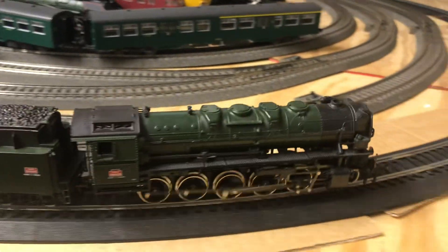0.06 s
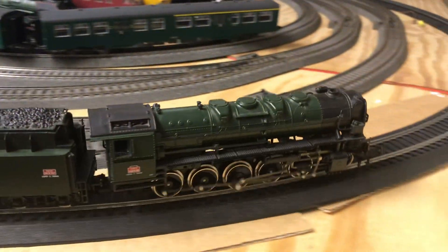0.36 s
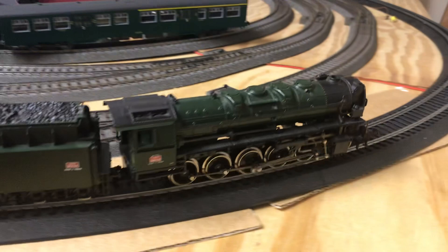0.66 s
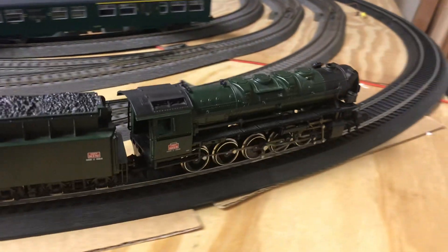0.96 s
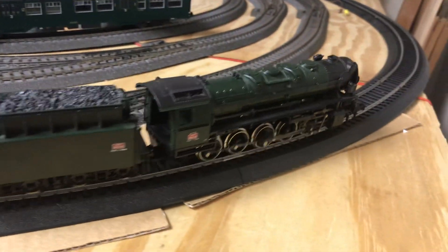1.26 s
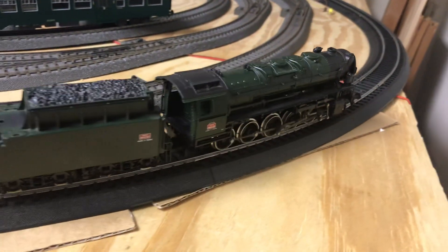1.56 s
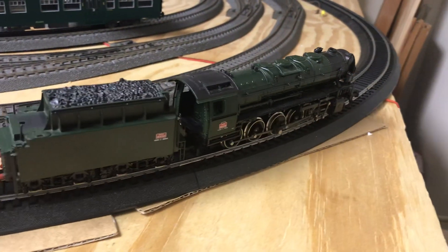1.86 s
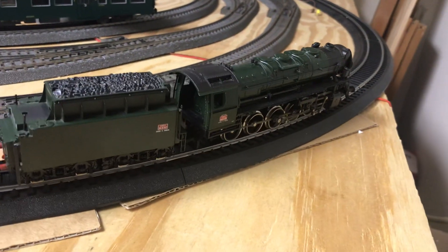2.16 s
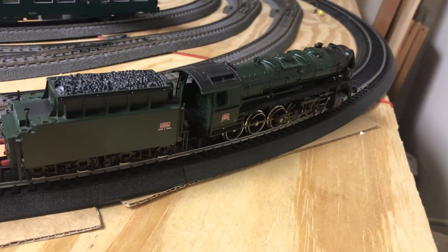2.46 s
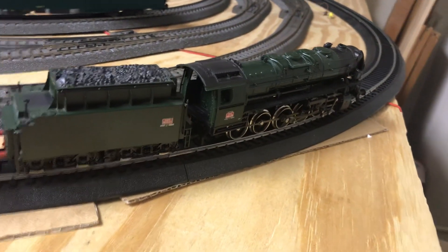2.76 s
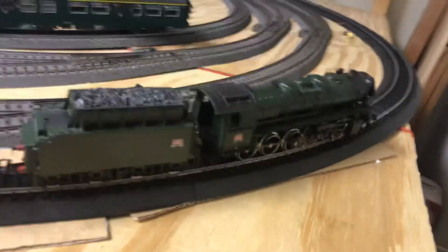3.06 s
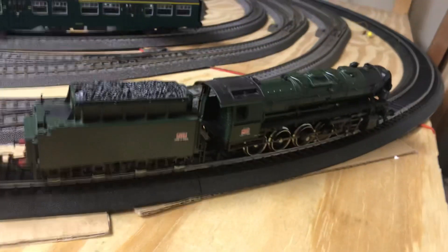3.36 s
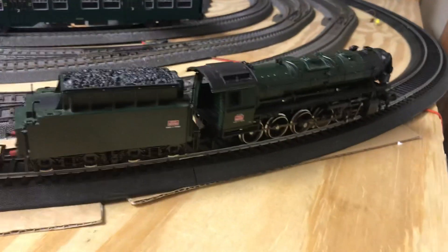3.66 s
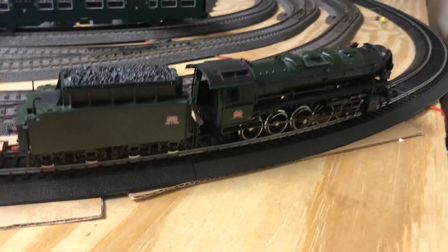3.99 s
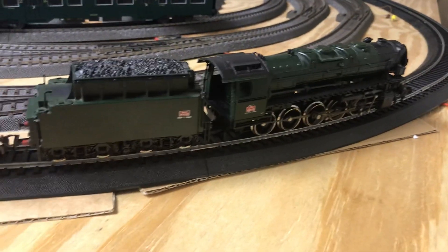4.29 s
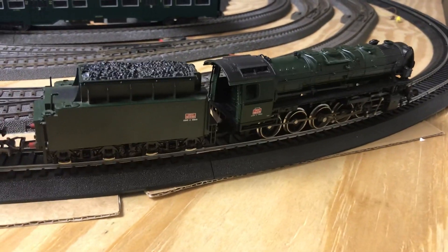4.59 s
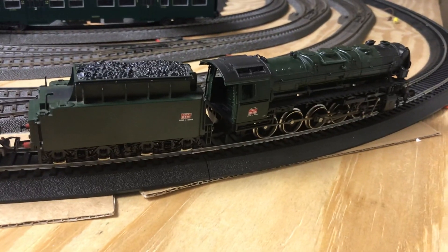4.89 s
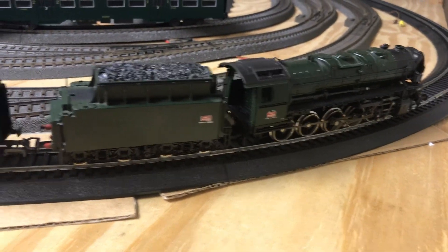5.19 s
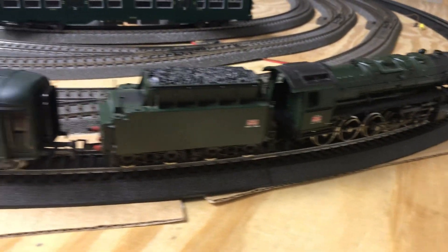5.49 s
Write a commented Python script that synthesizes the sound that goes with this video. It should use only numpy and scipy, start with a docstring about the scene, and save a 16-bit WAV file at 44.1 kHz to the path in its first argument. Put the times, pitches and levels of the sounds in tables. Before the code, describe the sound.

A model train's motor whines and rattles, falling in pitch until it stops; then a hand brushes near the microphone and a switch clicks.

```python
"""A quiet room with a plywood layout, where a model steam locomotive runs and slows to a stop.
Its gear teeth whine and chatter in the shell, its brushes fizz, its wheels grind and knock on the rails;
the whine falls with the speed. Then a hand slides and bumps on a case near the microphone,
a plastic switch clicks a little way off, and small things settle over faint rumble and hiss."""
import sys
import numpy as np
from scipy import signal
from scipy.fft import rfft, irfft, next_fast_len
from scipy.io import wavfile
from scipy.ndimage import map_coordinates

SR = 44100
rng = np.random.default_rng(int(sys.argv[2]) if len(sys.argv) > 2 else 0)


def materialize(psi):
    """Save the field psi as 16-bit PCM at rate SR to the path in sys.argv[1].

    A 1-D psi becomes a single channel; in a 2-D psi each row is a channel.
    """
    bounded = np.clip(np.atleast_2d(psi).T, -1, 1)
    quanta = np.round(bounded * 32767).astype(np.int16)
    wavfile.write(sys.argv[1], SR, quanta)


N = 253045

# drive speed, as the rate at which gear teeth meet: time_s, mesh_hz
DRIVE_SPEED = [(0, 1330.5), (.17, 1245), (.46, 1248.5), (.54, 1198), (.6, 1164.5), (.72, 1151.5),
               (.8, 1079), (.9, 991.5), (.98, 932), (1.13, 886), (1.2, 853), (1.41, 815), (1.5, 745),
               (1.55, 689.5), (1.6, 658), (1.68, 621.5), (1.73, 582), (1.78, 562.5), (1.85, 420.5),
               (1.92, 381.5), (2.02, 237.5), (2.1, 178), (2.2, 101), (2.26, -0.5)]
# swells and dips of the load on the drive: time_s, gain_db
DRIVE_LOAD = [(0, 0.5), (.55, -1), (.58, 1), (.68, 0.5), (.77, -1), (1, 0.5), (1.19, 1), (1.23, -0.5),
              (1.27, 0.5), (1.39, .5), (1.42, -3.5), (1.47, 1.5), (1.59, -2.5), (1.63, -0.5), (1.7, 1),
              (1.75, -1.5), (1.79, 2), (1.835, -2), (1.86, 2), (1.9, 0), (1.94, -4), (1.99, -1),
              (2.006, -7.5), (2.05, 3.5), (2.086, -7), (2.112, -6.5), (2.138, -1), (2.17, -10), (2.21, -19)]
# the engine turning away along the curve: time_s, rear_share
REAR_VIEW = [(0, 0.25), (.5, 0.2), (1.1, 0.59), (1.6, 1)]
# resonances: centre_hz, width_hz, gain_db
GEARBOX_MODES = [(592, 50, -46), (642, 100, -41), (835, 74, -35.5), (976, 36, -40), (1165.6, 50, -35.3),
                 (1249, 76, -42)]  # swell the whine as it slides through them
OCTAVE_MODES = [(1126, 130, -38.5), (1280, 114, -36), (1487, 200, -37), (1700, 85, -45), (2100, 190, -37)]  # swell the whine's octave
SHELL_MODES = [(594, 46, -9), (827, 33, -4), (980, 105, -11.5), (1264, 93, 0), (1474, 235, -5.5),
               (2120, 180, -7.5), (2690, 210, -6.5), (3700, 740, -18)]  # shell and chassis
ROD_MODES = [(810, 130, 0.5), (1335, 300, 5), (1720, 260, 0)]
# tone colours: frequency_hz, gain_db
CHATTER_EQ = [(40, -40), (130, -29), (280, -20), (420, -16), (520, -20.5), (700, -11.5), (1050, -7.5),
              (1350, -4.5), (1700, -5.5), (2150, -4), (2350, -10.5), (2800, -7.5), (3200, -23), (4500, -44)]  # midrange rasp of the teeth
WHEEL_EQ = [(1500, -25), (3150, -3.5), (3650, 2.5), (4500, 0), (5800, 0.5), (6800, -3.5), (7900, -10.5),
            (8800, -2.5), (10300, -13.5), (12000, -16)]  # bright metal on rail
BRUSH_SIDE_EQ = [(7000, -15), (10400, -10), (11300, -5.5), (12000, -6.5), (13100, -7.5), (14000, -1),
                 (14800, 5.5), (15800, -1.5)]  # fizz from the side
BRUSH_REAR_EQ = [(7000, -31), (10400, -12), (11300, 0.5), (12100, -3.5), (13000, 5), (14000, -2.5),
                 (14900, 0), (15800, -3.5)]  # fizz from behind
BOARD_EQ = [(20, -23), (45, -18), (65, -3), (85, 5), (200, -31), (600, -60)]  # plywood boom
SKIN_EQ = [(350, -45), (600, -9), (1160, -6.5), (1520, -10), (1790, -9.5), (4340, -15), (7100, -15),
           (15700, -21)]  # sliding skin
CASE_EQ = [(40, -26), (130, 9), (220, -16), (480, 5.5), (700, -15), (1150, -9.5), (1600, -5), (2400, -12.5),
           (4300, -8), (6500, -17), (15000, -44)]  # the bumped case
SWITCH_EQ = [(250, -33), (450, -0.5), (650, -13), (1150, -2), (1380, 3.5), (1600, -3), (2350, 2), (3100, 2),
             (4300, -2), (4700, -8.5), (7800, -16.5), (8800, -4.5), (9600, -30), (12000, -40)]  # plastic click
AIR_EQ = [(13, -45), (22, -15), (59, 0.5), (87, -9), (128, -8), (147, -9), (193, -7.5), (465, -18),
          (646, -20), (924, -23.5), (1470, -27), (2050, -29.5), (3010, -30), (5080, -33.5), (15700, -38.5)]  # room tone
# wheel and rod knocks: start_s, level_db, rod_share
KNOCKS = [(1.024, -22, 0), (1.1549, -20, 0.3), (1.34, -24.5, 0.07), (1.7748, -21, 0.8), (1.8931, -20, 0.25),
          (1.899, -28, 0.25), (1.923, -22, 0.4), (1.9492, -32, 0.2), (1.9722, -29.5, .7),
          (2.017, -30.5, 0.4), (2.043, -31, 0.54), (2.0594, -32.5, 0.26), (2.069, -36, 0.3), (2.1, -42, 1),
          (2.119, -29, 0.62), (2.131, -46, .9), (2.139, -45, 0.7), (2.145, -40.5, 0.6), (2.158, -43, 1),
          (2.185, -34, 0.76), (2.198, -39, 0.79), (2.229, -49.5, 1), (2.241, -53, 1)]
# skin catching on the case: start_s, level_db, cutoff_hz
SKIN_SLIPS = [(2.657, -39.5, 16000), (2.698, -51, 16000), (2.729, -41, 16000), (2.754, -33, 16000),
              (2.76, -45, 12000), (2.835, -29, 16000), (2.908, -41, 5000), (2.942, -29.5, 5500),
              (3.382, -43, 5500)]
# soft bumps of the hand: start_s, level_db, thud_offset_db, ring_hz, ring_t60_s
HAND_BUMPS = [(2.82, -39, -22, 510, 0.05), (2.827, -33.5, -34, 1086, 0.03), (2.8293, -31, -38, 492, 0.034),
              (2.832, -38.5, -28, 262, 0.04), (2.841, -33.5, -22, 1120, 0.016),
              (2.860, -32.5, -34, 1576, 0.03), (2.939, -41.5, -1, 516, 0.059),
              (2.941, -43, -28, 1630, 0.032), (2.975, -44.5, -7, 810, 0.017), (3.053, -53, 9, 400, 0.049),
              (3.243, -48.5, 3.5, 704, 0.075), (3.382, -48.5, 3, 347, 0.03), (3.466, -53.5, 1, 394, 0.045),
              (4.103, -51.5, -3, 412, 0.04), (5.676, -45, -13, 210, 0.048)]
# switch clicks: start_s, level_db, snap_offset_db, cutoff_hz
SWITCH_CLICKS = [(3.78, -52.5, -22, 2190), (3.878, -38.5, -40, 3050), (3.930, -29.5, -22, 9800),
                 (4.258, -28, -17.5, 11000), (4.74, -58, -4, 5500)]
# small things settling: start_s, level_db, pitch_hz
SETTLING_TICKS = [(4.469, -63, 1135), (4.742, -65, 2940), (4.769, -62.5, 766), (5.218, -68, 2930)]
# reverb time of the room: frequency_hz, t60_s
ROOM_DECAY = [(200, 0.27), (3000, 0.059), (12000, 0.074)]

TEETH, SEGMENTS = 16, 10  # gear teeth and commutator segments per shaft turn
TIME = np.arange(N) / SR
HIT_TIME = np.arange(SR // 3) / SR


def locomotive():
    """One slowing shaft drives the whine, hum, chatter, wheels and brushes."""
    mesh_hz = curve(DRIVE_SPEED) * (1 + 0.00583 * wobble(44.72))
    mesh = 2 * np.pi * np.cumsum(mesh_hz) / SR  # phase, one cycle per tooth
    shaft = mesh / TEETH
    crawl = np.clip(1 - mesh_hz / 650, 0, 1)  # 0 at speed, 1 at rest
    rear = np.clip(curve(REAR_VIEW), 0, 1)
    load_db = curve(DRIVE_LOAD)
    surge_db = (0.54 + crawl) * np.cos(2 * np.pi * 6.85 * TIME)  # deeper at a crawl
    approach_db = -3 * np.clip(1 - TIME / 0.41, 0, 1)  # fades up as the engine comes abreast
    chatter_db = -39.5 + slowdown_db(mesh_hz, knee_hz=292, steepness=2)
    chatter_db += 2.5 * rear + load_db + 0.5 * approach_db  # gears are louder from behind
    wheel_db = -42.5 + slowdown_db(mesh_hz, knee_hz=460, steepness=2.83) + surge_db + 0.75 * load_db
    brush_db = -39 + slowdown_db(mesh_hz, knee_hz=835, steepness=2.7) + approach_db + 0.43 * surge_db
    whine = gear_whine(mesh_hz, mesh, shaft)
    hum = motor_hum(shaft, crawl)
    chatter = amp(chatter_db) * gear_chatter(mesh_hz, mesh, shaft, crawl, rear)
    wheels = amp(wheel_db) * wheel_roll(mesh_hz, mesh, shaft, crawl)
    brushes = amp(brush_db) * brush_fizz(mesh_hz, mesh, shaft, rear)
    boom = amp(wheel_db - 28) * board_boom()
    shake_db = 0.87 * wobble(40.21) + 0.52 * wobble(140)  # the rods bind and free the drive
    return amp(shake_db) * (whine + hum + chatter + board_bounce(wheels + brushes) + boom)


def gear_whine(mesh_hz, mesh, shaft):
    """Uneven teeth sing a rough gearbox tone; its octave swells through resonances of its own."""
    drive = amp(0.81 + slowdown_db(mesh_hz, knee_hz=614, steepness=4.9))
    groan = amp(-60.5) * np.clip(mesh_hz / 200, 0, 1) ** 2  # bare gear tone, still there at a crawl
    tone_gain = (drive * swell(mesh_hz, GEARBOX_MODES) + groan) * amp(2.5 * wobble(70.1))
    tone = tone_gain * np.sin(mesh + 0.55 * wobble(130))
    octave_gain = drive * swell(2 * mesh_hz, OCTAVE_MODES) * amp(2.6 * wobble(90))
    smear = (mesh_hz / 1150) ** 2 * wobble(200)  # turns the octave raspy at speed
    octave = octave_gain * np.sin(2 * mesh + smear)
    return (tone + octave) * (1 + 0.068 * np.sin(shaft))  # the pinion runs slightly off centre


def gear_chatter(mesh_hz, mesh, shaft, crawl, rear):
    """Loose teeth scrape and rattle the shell under rippling torque; at a crawl the rods grind."""
    commutator_db = (2.5 + crawl) * np.cos(SEGMENTS * shaft)
    force = amp(commutator_db + 1.5 * np.cos(mesh) + 0.98 * np.cos(shaft) + 1.1 * wobble(700))
    strikes = 0.55 * (1 - crawl) * impacts(per_s=1400)
    shell = unit(filtered(force * (scrape(mesh_hz) + strikes), lambda hz: resonance(SHELL_MODES, hz)))
    rasp = coloured(force * (scrape(mesh_hz) + np.roll(strikes, SR // 1000)), CHATTER_EQ)
    grind = unit(filtered(force * scrape(mesh_hz), lambda hz: resonance(ROD_MODES, hz) ** 2))
    shell_db = -6.5 + 3.6 * rear - 6.9 * crawl
    rasp_db = -1 - 1.3 * rear - 7.6 * crawl
    return 0.7 * crawl * grind + amp(shell_db) * shell + amp(rasp_db) * rasp


def wheel_roll(mesh_hz, mesh, shaft, crawl):
    """Metal wheels grind over the rails in fine grains, duller at a crawl."""
    grains = scrape(mesh_hz) * amp(1.56 * wobble(1500) + 1.85 * np.cos(shaft) + 2.2 * np.cos(mesh))
    grit = coloured(grains, WHEEL_EQ)
    dull = unit(filtered(grit, lambda hz: lowpass(hz, cutoff_hz=5500)))
    return (1 - crawl) * grit + crawl * dull


def brush_fizz(mesh_hz, mesh, shaft, rear):
    """The brushes scrape hardest once a turn; their colour shifts as the engine turns away."""
    pressure_db = 2.8 * np.cos(shaft) + np.cos(2 * shaft) + 2 * np.cos(mesh)
    sparks = scrape(mesh_hz) * amp(pressure_db + 2.2 * wobble(900))
    return (1 - rear) * coloured(sparks, BRUSH_SIDE_EQ) + rear * coloured(sparks, BRUSH_REAR_EQ)


def clacks():
    """Wheels and loose rods knock the shell; the last ticks ratchet mostly on the rods."""
    out = np.zeros(N)
    for start_s, level_db, rod_share in KNOCKS:
        shell_share = 1 - rod_share
        shell = burst(lambda hz: abs(resonance(SHELL_MODES, hz)) + 0.18 * shell_share * eq(WHEEL_EQ, hz),
                      t60_s=0.025, rise_s=0.00031)
        rods = burst(lambda hz: resonance(ROD_MODES, hz) ** 2, t60_s=0.023, rise_s=0.0004)
        add(out, start_s, amp(level_db - 4) * (shell_share * shell + rod_share * rods))
    return out


def motor_hum(shaft, crawl):
    """The motor's five poles hum, fading out at a crawl."""
    return amp(-61 + 1.6 * wobble(30.15)) * (1 - crawl) * np.sin(5 * shaft + 0.44 * wobble(60.03))


def board_boom():
    """The rolling weight makes the plywood boom."""
    return coloured(rng.standard_normal(N), BOARD_EQ)


def board_bounce(sound):
    """A sound plus its bounce off the plywood, whose delay shrinks as the engine moves away."""
    delay_s = 0.0024 / (1 + 0.142 * TIME)
    return sound + 0.23 * map_coordinates(sound, [np.arange(N) - delay_s * SR])


def hand_rub():
    """Skin slides and catches on the case in one stroke that swells, fades and lifts off."""
    firmest_s, lift_off_s = 2.824, 3.1
    stroke_db = -57 + np.minimum(96 * (TIME - firmest_s), 48 * (firmest_s - TIME))
    touching = np.clip(1 - (TIME - lift_off_s) / 0.05, 0, 1)
    grain = rng.standard_normal(N) * amp(1.7 * wobble(300)) + 0.48 * impacts(per_s=410)
    out = touching * amp(stroke_db) * coloured(grain, SKIN_EQ)
    for start_s, level_db, cutoff_hz in SKIN_SLIPS:
        slip = burst(lambda hz: eq(SKIN_EQ, hz) * lowpass(hz, cutoff_hz), t60_s=0.033)
        add(out, start_s, amp(level_db - 15) * slip)
    return out


def hand_bumps():
    """Each bump knocks the case, rings one of its panels and gives a low thud."""
    out = np.zeros(N)
    for start_s, level_db, thud_offset_db, ring_hz, ring_t60_s in HAND_BUMPS:
        # a soft touch rings a low panel and has little treble
        knock = burst(lambda hz: eq(CASE_EQ, hz) * lowpass(hz, 4 * ring_hz, order=3),
                      t60_s=0.031, rise_s=0.00046)
        thud = np.sin(2 * np.pi * 53 * HIT_TIME + 0.86 * wobble(67, size=len(HIT_TIME)))
        thud *= amp(thud_offset_db) * envelope(t60_s=0.19, rise_s=0.0029)
        panel = ring(ring_hz, ring_t60_s)
        add(out, start_s, amp(level_db) * (amp(-8.5) * knock + amp(-1.5) * panel + thud))
    return out


def switch():
    """Plastic clicks with a bright snap and a short, dense decay."""
    out = np.zeros(N)
    for start_s, level_db, snap_offset_db, cutoff_hz in SWITCH_CLICKS:
        body = burst(lambda hz: eq(SWITCH_EQ, hz) * lowpass(hz, cutoff_hz), t60_s=0.097, rise_s=0.0015)
        snap = burst(lambda hz: hz > 4000, t60_s=0.13)
        add(out, start_s, amp(level_db) * (amp(-11.5) * body + amp(snap_offset_db - 9.5) * snap))
    return out


def settling():
    """Small things tick faintly, each on its own pitch."""
    out = np.zeros(N)
    for start_s, level_db, pitch_hz in SETTLING_TICKS:
        add(out, start_s, amp(level_db) * ring(pitch_hz, t60_s=0.07))
    return out


def room_reverb(sound):
    """The small room's short tail, in which the bass lingers longest."""
    hz, time_s, noise = signal.stft(rng.standard_normal(SR // 3), SR, nperseg=256)
    decay = 10 ** (-3 * time_s / along(ROOM_DECAY, hz)[:, None])
    tail = signal.istft(noise * decay, SR, nperseg=256)[1]
    predelayed = np.pad(tail / np.linalg.norm(tail), (SR // 300, 0))
    return signal.fftconvolve(sound, predelayed)[:N]


def room_tone():
    """A bed of rumble and hiss, with a faint, regular electrical tick in the top treble."""
    ticks = np.zeros(N)
    for start_s in np.arange(0.035, N / SR - 0.01, 0.1024):
        gain = amp(-63 + rng.normal(0, 1.2))
        add(ticks, start_s, gain * burst(lambda hz: hz > 12000, t60_s=0.005, rise_s=0.0001))
    return amp(-64.5 + 0.15 * wobble(7)) * coloured(rng.standard_normal(N), AIR_EQ) + ticks


def slowdown_db(mesh_hz, knee_hz, steepness):
    """Fader for a running sound: flat at speed, a power of the speed below the knee."""
    return -10 * np.log10(1 + (knee_hz / np.maximum(mesh_hz, 1)) ** (2 * steepness))


def scrape(mesh_hz):
    """Contact noise, only while the drive turns."""
    return (mesh_hz > 0) * rng.standard_normal(N)


def impacts(per_s):
    """Sparse random impulses of uneven size, at rms 1."""
    return unit((rng.random(N) < per_s / SR) * rng.standard_normal(N))


def swell(hz, modes):
    """Gain of a gear tone from the resonances near its pitch."""
    return sum(amp(db) / (1 + (2 * (hz - centre) / width) ** 2) for centre, width, db in modes)


def resonance(modes, hz):
    """Complex response of a body whose modes alternate in polarity."""
    return sum((-1) ** k * amp(db) * 1j * hz * width / (centre ** 2 - hz ** 2 + 1j * hz * width)
               for k, (centre, width, db) in enumerate(modes))


def ring(hz, t60_s):
    """One struck mode, its pitch a little unsteady."""
    phase = 2 * np.pi * hz * HIT_TIME + 0.61 * wobble(hz / 3, size=len(HIT_TIME))
    return np.sin(phase) * envelope(t60_s, rise_s=0.00017)


def burst(response, t60_s, rise_s=0.00029):
    """A hit of filtered noise that dies away."""
    return unit(filtered(rng.standard_normal(len(HIT_TIME)), response)) * envelope(t60_s, rise_s)


def envelope(t60_s, rise_s):
    """Fast attack, exponential decay."""
    return 10 ** (-3 * HIT_TIME / t60_s) * (1 - np.exp(-HIT_TIME / rise_s))


def wobble(per_s, size=N):
    """A smooth random curve with per_s knots a second."""
    knots = rng.standard_normal(int(size * per_s / SR) + 4)
    return map_coordinates(knots, [np.arange(size) * per_s / SR])


def curve(points):
    """An automation lane, one value per sample."""
    return np.interp(TIME, *np.transpose(points))


def along(points, hz):
    """Interpolate on a log frequency axis."""
    knots_hz, values = np.transpose(points)
    return np.interp(np.log(hz + 1), np.log(knots_hz + 1), values)


def filtered(sound, response):
    """Shape a sound by a function of frequency."""
    size = next_fast_len(len(sound) + 8192)
    return irfft(rfft(sound, size) * response(np.fft.rfftfreq(size, 1 / SR)), size)[:len(sound)]


def coloured(sound, colour):
    """A sound through an EQ curve, at rms 1."""
    return unit(filtered(sound, lambda hz: eq(colour, hz)))


def eq(colour, hz):
    return amp(along(colour, hz))


def lowpass(hz, cutoff_hz, order=4):
    return 1 / (1 + (hz / cutoff_hz) ** order)


def amp(db):
    return 10 ** (np.asarray(db) / 20)


def unit(sound):
    return sound / np.sqrt(np.mean(sound ** 2) + 1e-20)


def add(track, start_s, sound):
    part = track[round(start_s * SR):][:len(sound)]
    part += sound[:len(part)]


def scene():
    """The train on its layout, then the hand and the switch, over the quiet room."""
    train = locomotive() + clacks()
    train += amp(-16) * room_reverb(train)
    clicks = switch() + settling()
    hand = hand_rub() + hand_bumps()
    hand += amp(-8) * room_reverb(hand)
    return (train + clicks + hand + room_tone())[None]


def record(dry):
    """A steep high cut on the mono mix."""
    cutoff_hz = 15830
    return filtered(dry[0], lambda hz: np.clip((cutoff_hz - hz) / 200 + 0.5, 0, 1))[None]


dry = scene()
out = record(dry)
materialize(out)
```